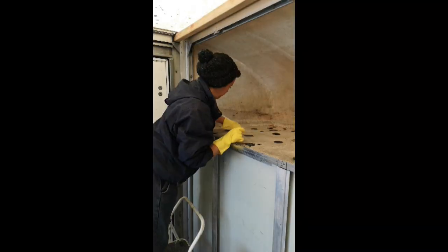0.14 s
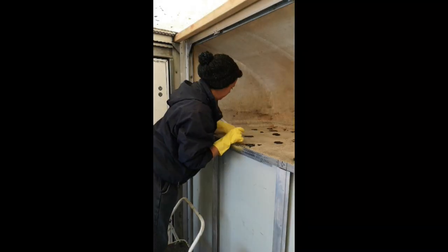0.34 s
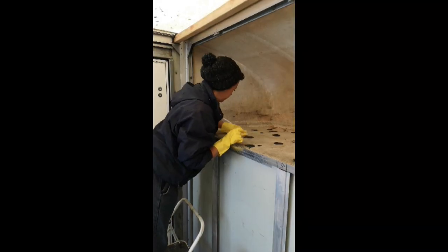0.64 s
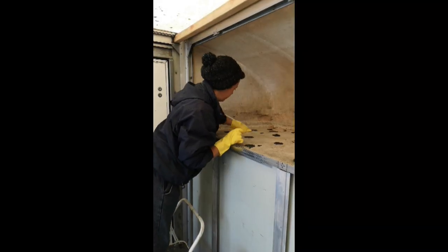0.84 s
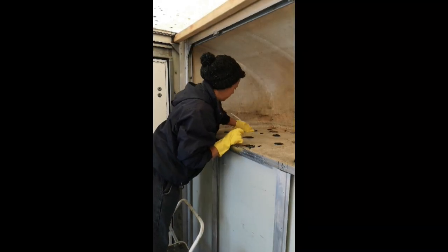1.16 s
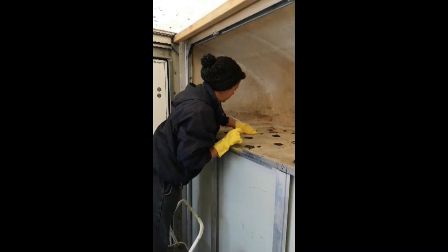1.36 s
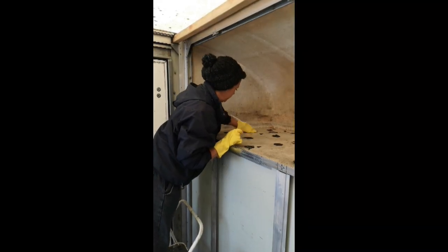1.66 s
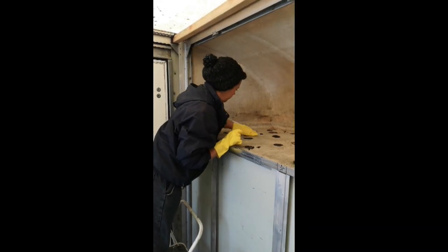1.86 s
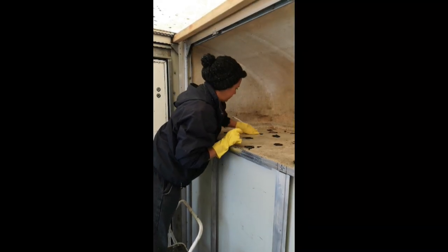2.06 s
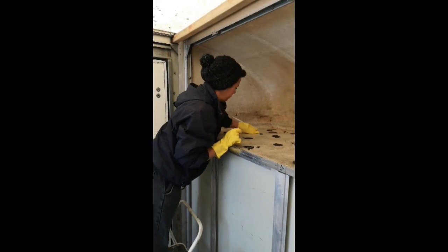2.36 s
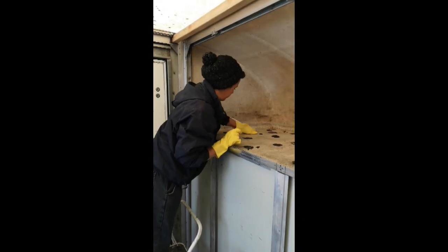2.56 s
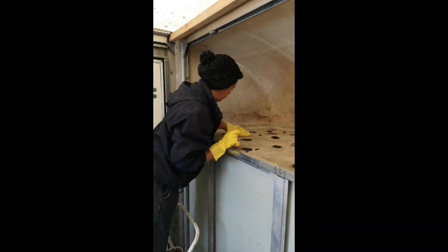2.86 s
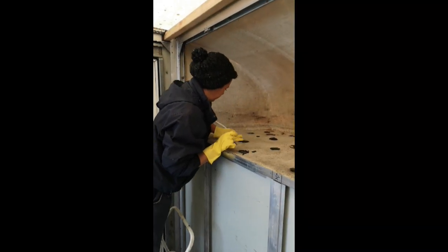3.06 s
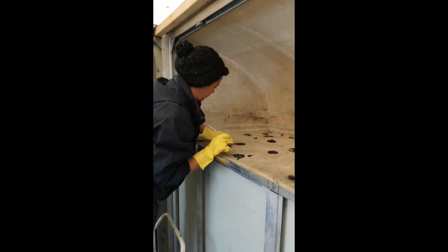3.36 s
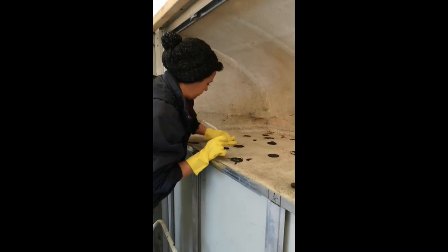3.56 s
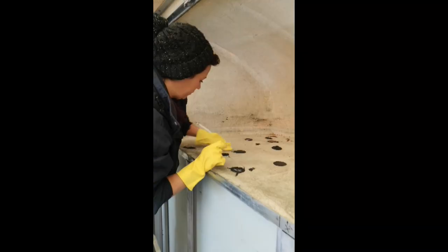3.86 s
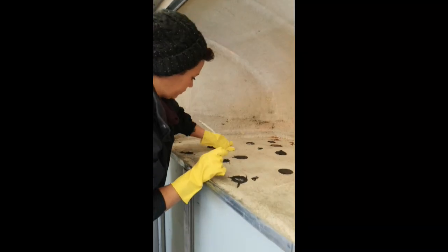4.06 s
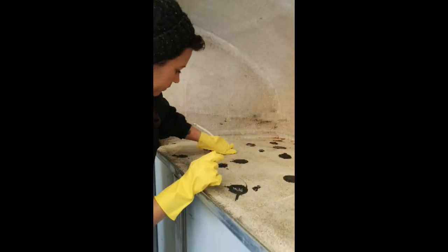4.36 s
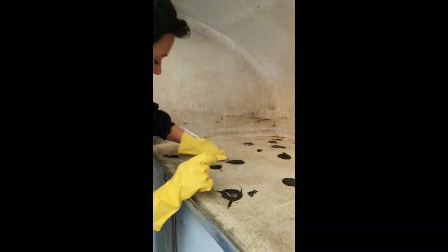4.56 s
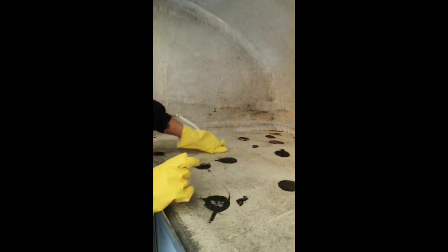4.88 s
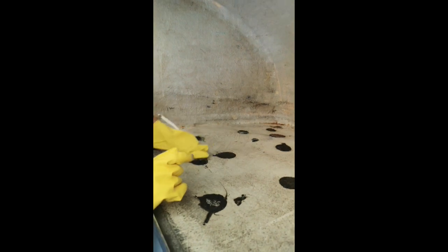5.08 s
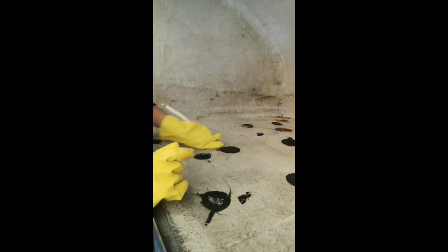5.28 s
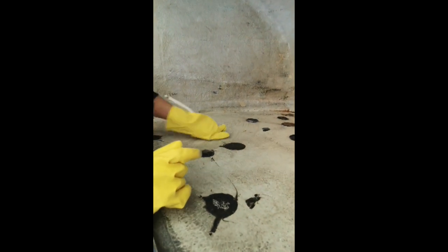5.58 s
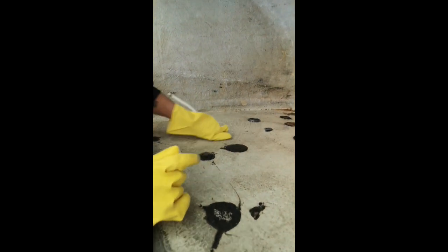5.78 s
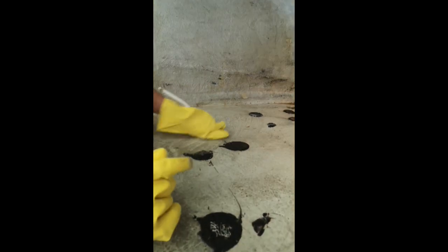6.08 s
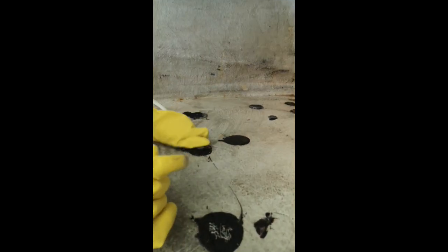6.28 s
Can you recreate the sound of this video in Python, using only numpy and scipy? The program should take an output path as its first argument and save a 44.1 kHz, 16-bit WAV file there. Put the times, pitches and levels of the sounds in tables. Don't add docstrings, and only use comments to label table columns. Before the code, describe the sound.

Rapid, dry, hissing scrub strokes inside a van, alternating softer push and stronger pull, over low rumbles, dull knocks and a few tiny glove chirps.

```python
import sys
import numpy as np
from scipy import signal
from scipy.fft import rfft, irfft, next_fast_len
from scipy.io import wavfile
from scipy.ndimage import uniform_filter1d, map_coordinates

SR = 44100
rng = np.random.default_rng(int(sys.argv[2]) if len(sys.argv) > 2 else 0)


def dump(signal):
    limited = np.clip(np.atleast_2d(signal).T, -1, 1)
    pcm = np.round(limited * 32767).astype(np.int16)
    wavfile.write(sys.argv[1], SR, pcm)


def gain_from_db(level_db):
    decades = np.asarray(level_db, float) / 20
    return 10 ** decades


N = 283695


def unit(x):
    return x / np.sqrt(np.mean(x ** 2) + 1e-20)


def along(points, hz):
    f, v = np.transpose(points)
    return np.interp(np.log(hz + 1), np.log(f + 1), v)


def colour(points):
    return lambda hz: gain_from_db(along(points, hz)) * (hz > points[0][0] / 2)


def curves(rows):
    s, *cols = np.transpose(rows)
    t = np.arange(N) / SR
    return [np.interp(t, s, c) for c in cols]


def wobble(rate_hz):
    knots = rng.standard_normal(int(N * rate_hz / SR) + 4)
    return map_coordinates(knots, [np.arange(N) * rate_hz / SR])


def filtered(x, response):
    m = next_fast_len(N + SR // 4)
    return irfft(rfft(x, m) * response(np.fft.rfftfreq(m, 1 / SR)), m)[..., :N]


# (push start [s], pull start [s], push peak [dB], pull peak [dB],
# place of push top speed [0-1])
STROKES = [(0.174, 0.312, -29, -20.5, .56), (0.487, 0.649, -24.3, -23.2, .48),
           (0.794, 0.938, -24.5, -20.5, .47), (1.075, 1.222, -25, -20.5, .47),
           (1.376, 1.515, -23.7, -21.3, .4), (1.654, 1.775, -24.5, -19.5, .45),
           (1.926, 2.063, -23.5, -20.2, .54), (2.234, 2.381, -23.5, -19.8, .44),
           (2.563, 2.702, -23.5, -21.3, .57), (2.878, 3.017, -25, -24.2, .58),
           (3.173, 3.303, -26.5, -23.5, .55), (3.461, 3.588, -27, -25.8, .6),
           (3.728, 3.876, -24.5, -21, .53), (4.035, 4.176, -25, -23.8, .5), (4.317, 4.457, -23, -21.5, .5),
           (4.604, 4.742, -24.5, -21.7, .49), (4.877, 5.03, -25.5, -21, .46),
           (5.184, 5.325, -22, -19.3, .52), (5.493, 5.645, -19.8, -19, .52),
           (5.781, 5.921, -21.5, -17.5, .47), (6.074, 6.231, -19, -16.8, .49),
           (6.373, 6.53, -25, -19.5, .42)]
# (time [s], panel share [dB])
PRESSURE = [(0.2, -15.5), (0.8, -14.5), (1.2, -19.5), (1.6, -16), (2.3, -16), (2.9, -15), (3.4, -13.5),
            (3.7, -16), (3.95, -11), (4.15, -15), (4.5, -14), (5.0, -11), (5.4, -12), (5.7, -14),
            (6.0, -12.5), (6.2, -14.5), (6.43, -11.5)]


def hand():
    usual_db, panel_lag, creep_follow = -22.5, 0.573, .3
    halt_s, pull_place = .003, .54
    rows = np.array(STROKES)
    start_s, peak_db = rows[:, :2].ravel(), rows[:, 2:4].ravel()
    place = np.ravel([(np.clip(row[-1], .2, .8), pull_place) for row in STROKES])
    arc_power = np.tile((.8, .85), len(STROKES))
    creep_db = np.tile((-39, -38), len(STROKES))
    panel_lean_db = np.tile((-1.2, .8), len(STROKES))

    t = np.arange(N) / SR
    k = np.clip(np.searchsorted(start_s, t) - 1, 0, len(start_s) - 2)
    u = np.clip((t - start_s[k]) / (start_s[k + 1] - start_s[k] - halt_s), 0, 1)
    u = u ** (np.log(.5) / np.log(place[k]))
    speed = np.abs(np.sin(np.pi * u)) ** arc_power[k]

    creep = gain_from_db(np.interp(t, start_s, creep_db + creep_follow * (peak_db - usual_db)))
    level = np.sqrt(creep ** 2 + (speed * gain_from_db(peak_db[k])) ** 2)
    middle_s = (start_s[:-1] + start_s[1:]) / 2
    effort_db = np.interp(t, middle_s, peak_db[:-1] - usual_db)
    panel_db = curves(PRESSURE)[0] - panel_lag * effort_db + panel_lean_db[k] * (2 * u - 1)
    return speed, level, gain_from_db(panel_db)


def ticks(speed, per_s, spread_db):
    chance = per_s / SR * (.25 + .75 * speed)
    caught = rng.random(N) < chance
    size_db = spread_db * np.minimum(rng.exponential(size=N), 3.2)
    size = gain_from_db(size_db) * rng.standard_normal(N)
    return unit(caught * size / np.sqrt(chance))


# (frequency [Hz], t60 [s])
CABIN_T60 = [(500, 0.109), (3000, 0.126), (9000, 0.0744), (16000, 0.0328)]


def cabin(x):
    out, step, delay = np.zeros((2, N + SR)), int(.4 * SR), 90
    for a in range(0, N, step):
        hz, t, z = signal.stft(rng.standard_normal((2, SR // 5)), SR, nperseg=256)
        decay = gain_from_db(-60 * t / along(CABIN_T60, hz)[:, None])
        tail = signal.istft(z * decay, SR, nperseg=256)[1]
        wet = signal.fftconvolve(x[None, a:a + step], tail / np.linalg.norm(tail[0]), axes=1)
        out[:, a + delay:a + delay + wet.shape[1]] += wet
    return out[:, :N]


def patchy(x, depth_db):
    z = signal.stft(x, nperseg=512)[2]
    field = uniform_filter1d(rng.standard_normal(z.shape), size=6, axis=1)
    field = uniform_filter1d(field, size=5, axis=2)
    return signal.istft(z * gain_from_db(depth_db * unit(field)), nperseg=512)[1][:, :N]


# (frequency [Hz], level [dB per Hz])
GRIT = [(2500, -29), (4000, -27), (5500, -5), (7000, 4.5), (9500, 3), (11000, -5), (13000, -22),
        (16000, -16.5)]
# (frequency [Hz], level [dB per Hz])
FINE_GRIT = [(8000, -15.5), (11000, -3.5), (13000, -6), (16000, -12.5)]
# (frequency [Hz], level [dB per Hz])
PANEL = [(500, -13), (1200, -6.5), (2200, -6.5), (3200, -1), (4500, 0), (6000, -4.5), (9000, -6.5)]


def pad():
    speed, level, panel = hand()
    level = level * gain_from_db(0.99 * wobble(60) + 0.384 * wobble(220))
    shared = ticks(speed, per_s=9000, spread_db=2.2)
    own = np.array([ticks(speed, per_s=9000, spread_db=2.2) for _ in range(2)])
    catches = level * (0.429 * shared + 0.8793 * own)
    heard = patchy(catches + gain_from_db(-7) * cabin(level * shared), depth_db=1.4)

    hiss = gain_from_db(-9.5) * filtered(heard, colour(GRIT))
    brighter = .2 + .8 * speed
    hiss = hiss + gain_from_db(-10) * brighter * filtered(heard, colour(FINE_GRIT))
    patches = gain_from_db(1.6 * np.array([wobble(13), wobble(18)]))
    return hiss + gain_from_db(8.5) * panel * patches * filtered(heard, colour(PANEL))


def steadied(x, span_s):
    slow = np.abs(uniform_filter1d(np.mean(x ** 2, axis=0), size=int(span_s * SR))) + 1e-3
    return unit(x / slow ** 0.243)


# (frequency [Hz], left-right likeness [correlation])
LIKENESS = [(60, 0.98), (150, 0.93), (380, 0.9), (950, 0.37), (2380, 0.69), (5980, -0.25), (15000, -4.6)]


def shake(spectrum, level_db, lumpy_db, rate_hz):
    def mid_side(hz):
        turn = np.arccos(np.clip(along(LIKENESS, hz), 0, 1)) / 2
        return colour(spectrum)(hz) * [np.cos(turn), np.sin(turn)]

    pair = gain_from_db(lumpy_db * wobble(rate_hz)) * rng.standard_normal((2, N))
    mid, side = filtered(pair, mid_side)
    stereo = unit(np.array([mid + side, mid - side]))
    return gain_from_db(level_db) * steadied(stereo, span_s=0.068)


# (peak time [s], time to fall about 9 dB [s], strength [dB], knock over boom [dB])
LEANS = [(0.42, 0.13, -37, -7.5), (0.5, 0.1245, -36, -7), (1.1, 0.0753, -36, -13), (1.35, 0.22, -37, -12),
         (1.89, 0.41, -40, -12), (2.18, .1, -38, -9), (2.41, .16, -36, -8), (2.83, .07, -38, -1),
         (3.11, .12, -38, -3), (3.3, .06, -42, -4), (3.4, 0.11, -37, -5), (3.51, 0.1738, -34, -3),
         (3.98, 0.2052, -30.5, -6.5), (4.2, 0.07, -31.5, -16), (4.27, .06, -41, -4),
         (4.62, .1, -38.5, -6.5), (4.88, 0.1348, -33.5, -8.5), (5.07, 0.28, -42.5, -4.5),
         (5.46, 0.11, -22.5, -12.5), (5.58, .08, -29.5, -8), (5.8, 0.22, -39.5, -6),
         (5.98, 0.01, -38.5, -3), (6.05, 0.22, -33, -4.5), (6.36, .1, -35.5, -3.5)]


def leans_db():
    rise_s = 0.0332
    t = np.arange(N) / SR
    boom, knock = gain_from_db(-44) ** 2, gain_from_db(-51) ** 2
    for s, fall_s, db, over_db in LEANS:
        away = np.where(t < s, (s - t) / rise_s, (t - s) / fall_s)
        power = gain_from_db(db - 8.71 * away) ** 2
        boom = boom + power
        knock = knock + power * gain_from_db(over_db) ** 2
    return 10 * np.log10(boom), 10 * np.log10(knock)


# (time [s], peak [dB], frequency [Hz], t60 [s])
THUMPS = [(0.385, -28, 115, .1), (0.515, -25, 125, .1), (0.84, -25, 45, .1), (1.35, -26, 100, .08),
          (2.04, -27, 112, .09), (2.82, -27, 90, .07), (3.52, -25, 97, .12), (3.969, -21, 120, 0.071),
          (4.079, -24, 90, 0.124), (4.19, -28, 103, 0.08), (4.659, -25, 40.4, 0.07),
          (4.77, -21, 40.4, 0.103), (4.908, -23, 40, 0.073), (5.458, -14.5, 88.8, 0.109),
          (5.529, -10.5, 60, 0.0966), (5.671, -14, 45.5, 0.11), (5.78, -25, 56.5, 0.0707),
          (5.96, -22, 40, 0.09), (6.058, -21.5, 94.2, 0.092), (6.105, -22, 58, .1), (6.25, -24, 50, .1)]


def thumps():
    out, t = np.zeros(N + SR), np.arange(SR // 4) / SR
    swell = 1 - np.exp(-t / 0.00883)
    for s, db, hz, t60 in THUMPS:
        ring = gain_from_db(db + 5.5 - 60 * t / t60) * np.sin(2 * np.pi * hz * t)
        out[round(s * SR):][:len(t)] += swell * ring
    return out[:N]


# (time [s], time to fall 7 dB [s], level [dB])
SCRAPES = [(0.53, .04, -42), (0.808, 0.038, -44.5), (2.249, 0.042, -43), (2.816, 0.031, -34),
           (3.06, 0.041, -44.5), (3.211, .04, -45), (3.392, 0.06, -43.5), (3.973, 0.037, -40),
           (4.84, 0.0196, -36), (5.201, 0.042, -41.5), (5.422, .03, -30.5), (5.46, 0.033, -39),
           (5.523, 0.0334, -35.5), (5.671, .04, -44.5), (6.013, .04, -38), (6.039, .03, -40),
           (6.311, 0.053, -43), (6.397, 0.029, -41)]


def scrapes_db():
    t = np.arange(N) / SR
    burst = np.zeros(N)
    for s, length_s, db in SCRAPES:
        attack = np.clip((t - s) / 0.00274, 0, 1)
        burst += attack * gain_from_db(db - 7 * np.clip(t - s, 0, 1) / length_s)
    return 20 * np.log10(burst + 1e-6)


# (time [s], strength [dB])
SWAY = [(0.19, -42.5), (0.35, -37), (0.72, -40), (0.86, -34), (1.05, -41.5), (1.4, -36.5), (1.9, -38),
        (2.3, -42.5), (2.6, -40), (3.3, -40.5), (3.9, -33), (4.2, -33), (4.5, -37.5), (4.85, -28.5),
        (5.3, -35.5), (5.6, -27.5), (6.1, -29), (6.43, -35)]
# (frequency [Hz], level [dB per Hz])
RUMBLE = [(7, -25.5), (12, 5), (25, 6), (45, 5), (70, -0.5), (95, -32.5)]
# (frequency [Hz], level [dB per Hz])
BOOM = [(55, -55.5), (80, 3), (105, 0), (160, -5), (230, -32)]
# (frequency [Hz], level [dB per Hz])
KNOCK = [(150, -10.5), (200, -4), (235, -0.5), (280, -6.5), (310, -1.5), (335, -8.5), (360, -4), (430, -14),
         (520, -10.5), (700, -26.5)]
# (frequency [Hz], level [dB per Hz])
SCUFF = [(400, -10.5), (600, -1), (880, 3), (1150, -1), (1500, -3), (2200, -7), (3500, -30.5)]


def van():
    rumble_db, = curves(SWAY)
    boom_db, knock_db = leans_db()
    speed = hand()[0]
    drag_db = -48.5 + 2.5 * speed
    scuff_db = 20 * np.log10(np.hypot(gain_from_db(drag_db), gain_from_db(scrapes_db()))) - 1.5
    low = shake(RUMBLE, rumble_db, lumpy_db=2.5, rate_hz=8)
    low = low + shake(BOOM, boom_db, lumpy_db=1.5, rate_hz=14)
    high = shake(KNOCK, knock_db, lumpy_db=2.0, rate_hz=25)
    high = high + shake(SCUFF, scuff_db, lumpy_db=1.5, rate_hz=50)
    pushes = thumps()
    load = np.sqrt(np.abs(uniform_filter1d(pushes ** 2, size=1500)))
    low = low / (1 + load / gain_from_db(-32))
    return (low + patchy(high, depth_db=1.79) + pushes) * gain_from_db([[-.6], [.6]])


# (time [s], frequency [Hz], half length [s], level [dB])
SQUEAKS = [
    (6.043, 1490, .013, -36),
    (6.31, 1420, .012, -43),
    (5.54, 1650, .012, -42),
]


def glove():
    t = np.arange(N) / SR
    rough = 1 + 0.33 * wobble(150)
    chirps = np.zeros(N)
    for s, hz, half_s, db in SQUEAKS:
        chirps += gain_from_db(db) * np.exp(-((t - s) / half_s) ** 2) * np.sin(2 * np.pi * hz * t)
    return rough * chirps


# (time [s], left minus right [dB])
PAN = [
    (0.2, -5.0),
    (1.15, -4),
    (1.62, -2),
    (2.3, -2.5),
    (3.03, -4),
    (5.09, -2.0),
    (6.13, -1.42),
    (6.43, -2.5),
]


def scene():
    pan_db = curves(PAN)[0] + 1.47
    return pad() * gain_from_db(np.array([pan_db / 2, -pan_db / 2])) + van() + glove()


def band_limit(x):
    return signal.sosfilt(signal.butter(12, 17070, fs=SR, output="sos"), x)


# (frequency [Hz], width [Hz], level [dB])
PORTS = [(7888, 988, 8), (8349, 714.5, 13.5)]


def record(dry):
    start_s, fade_s, top_hz = .188, .003, 15750

    def ports(f):
        return np.array([1 + gain_from_db(db) * 1j * f * w / (c * c - f * f + 1j * f * w) for c, w, db in PORTS])

    heard = filtered(dry, ports)
    heard = heard / (1 + np.abs(heard / .7) ** 4) ** (1 / 4)
    gate = np.clip((np.arange(N) / SR - start_s) / fade_s, 0, 1)
    mix = filtered(heard, lambda f: f < top_hz) * gate
    return band_limit(mix)


dry = scene()
out = record(dry)
dump(out)
```